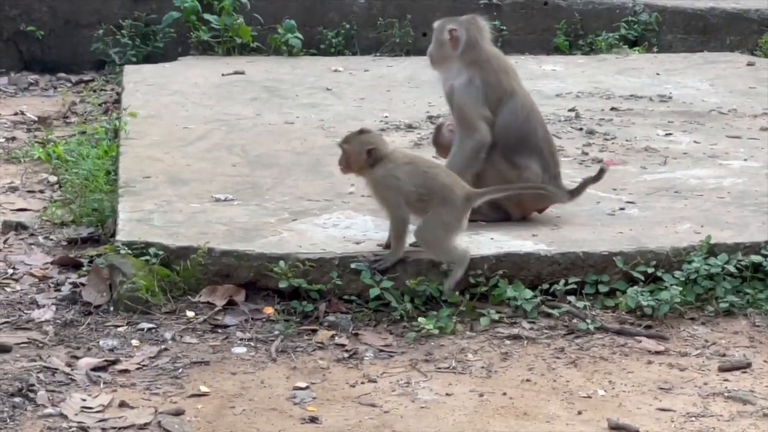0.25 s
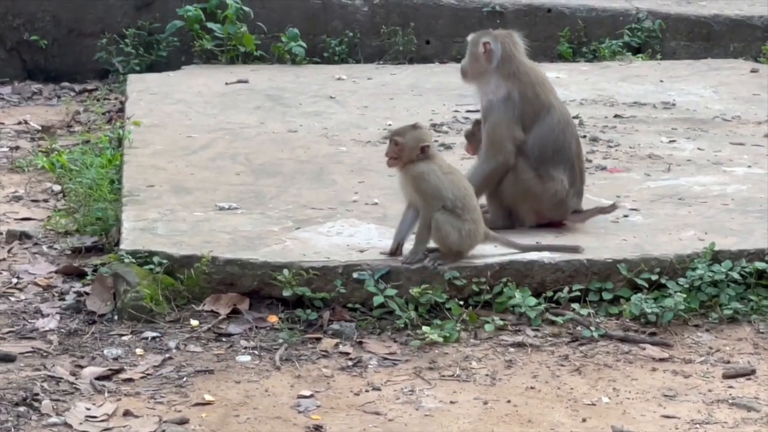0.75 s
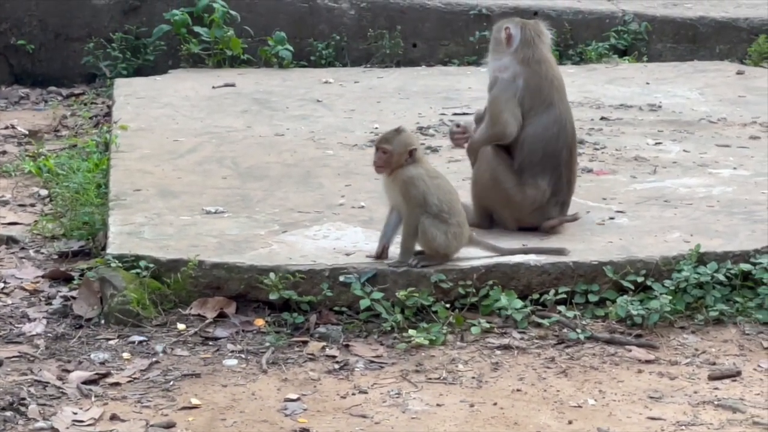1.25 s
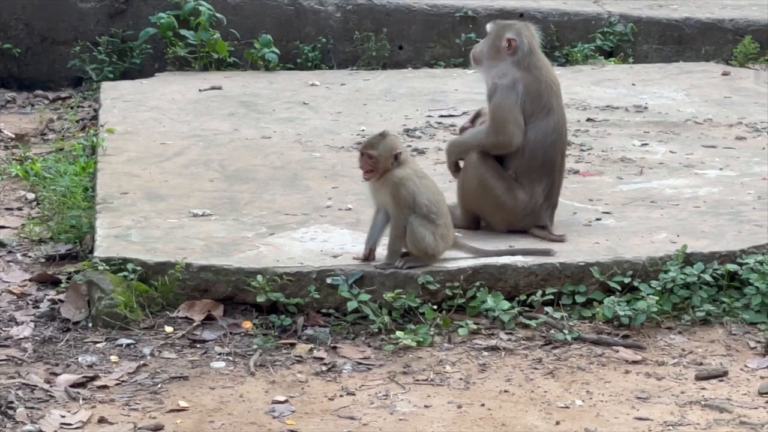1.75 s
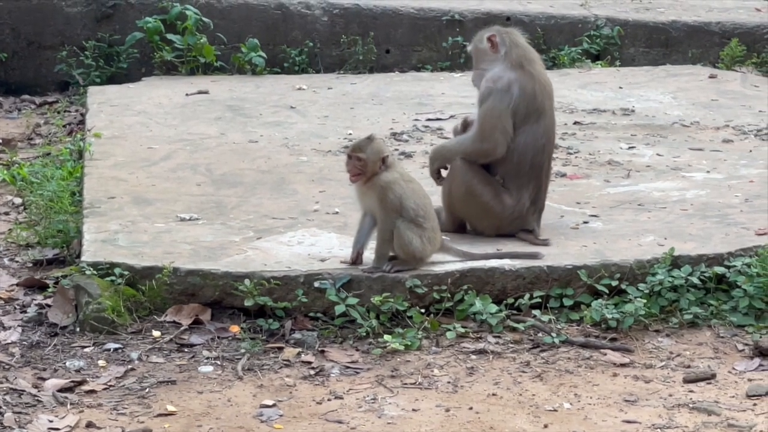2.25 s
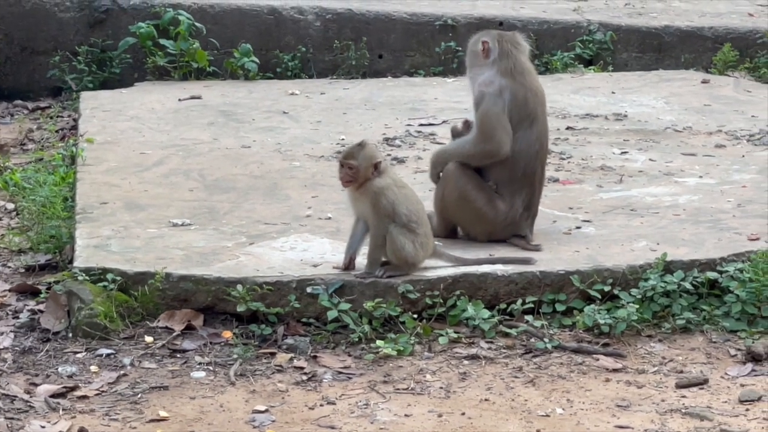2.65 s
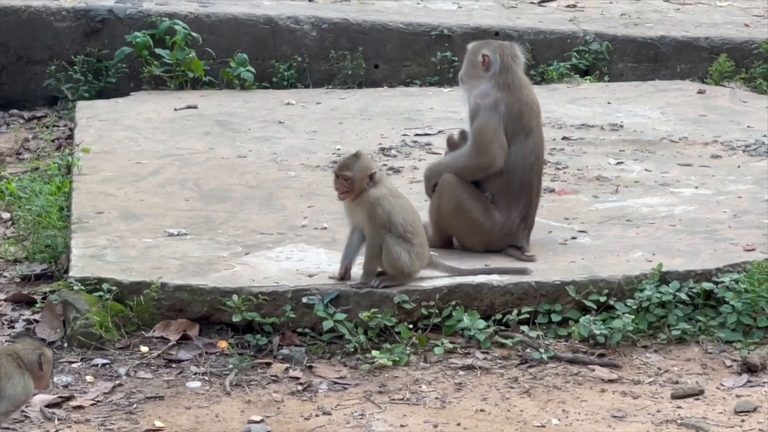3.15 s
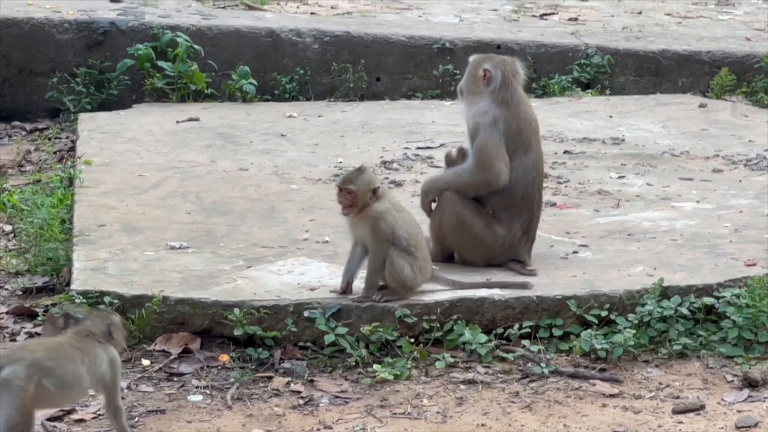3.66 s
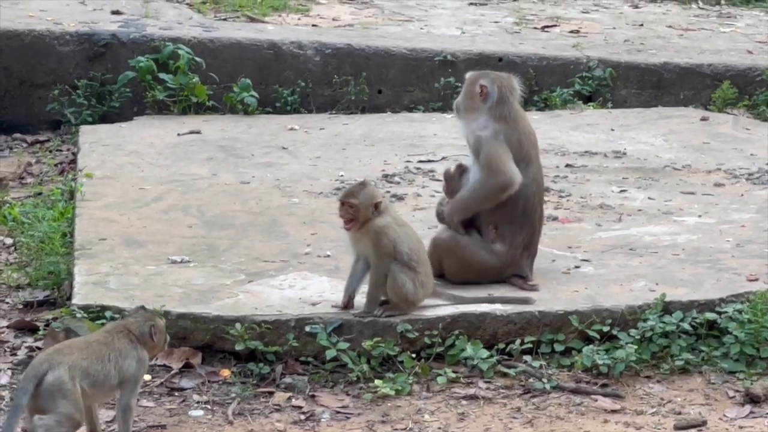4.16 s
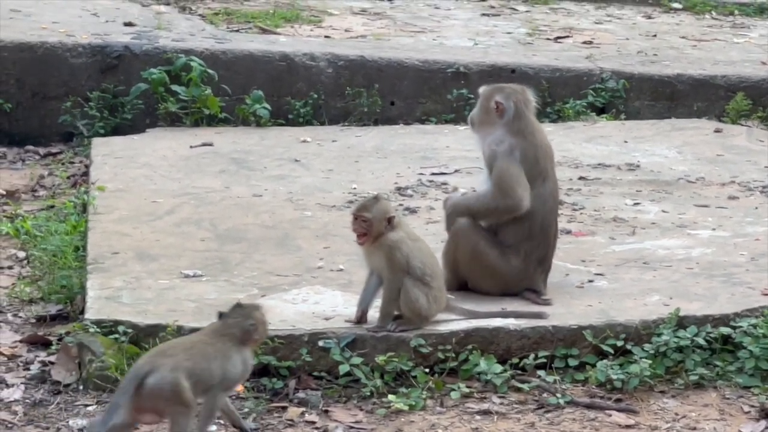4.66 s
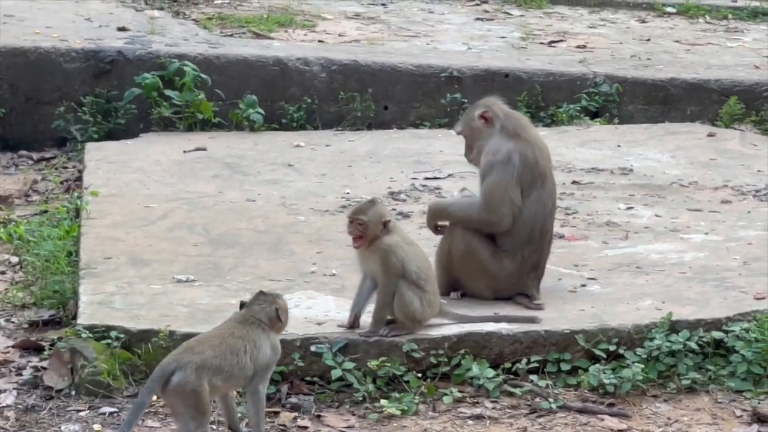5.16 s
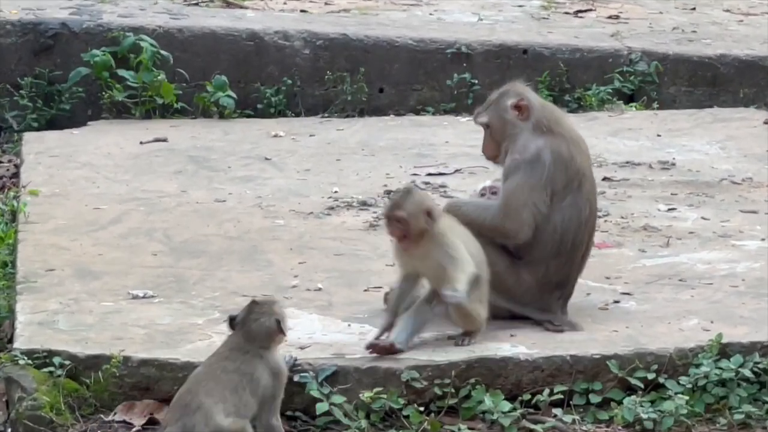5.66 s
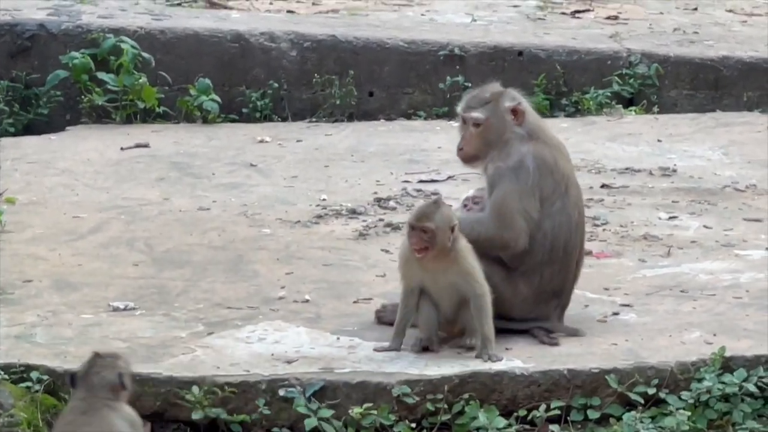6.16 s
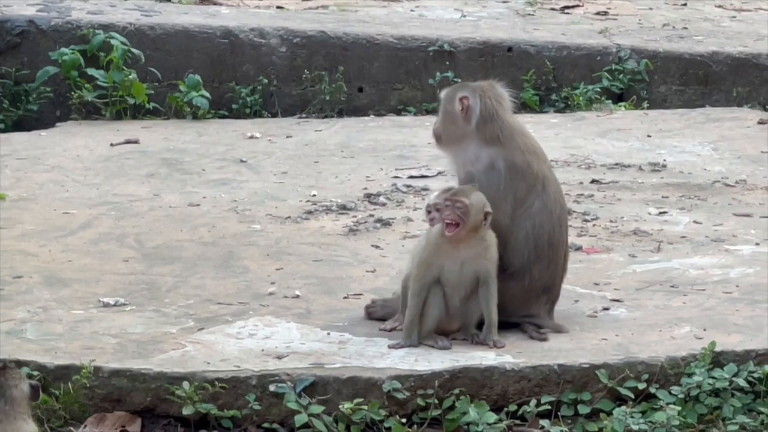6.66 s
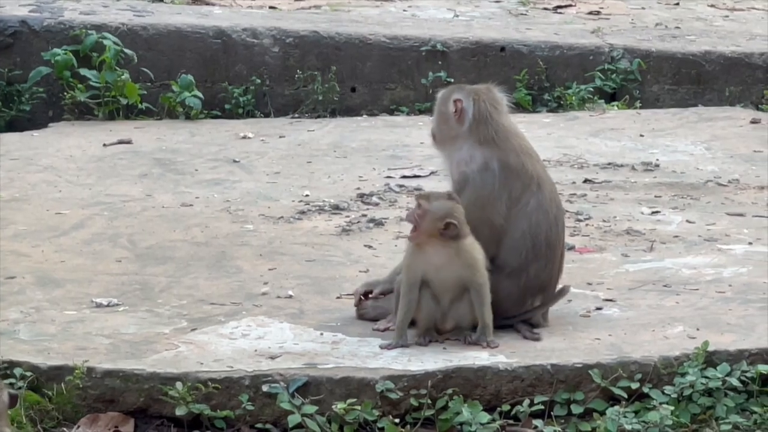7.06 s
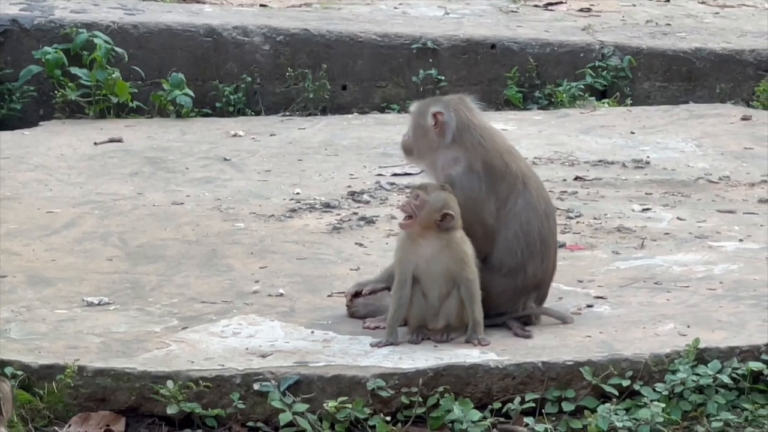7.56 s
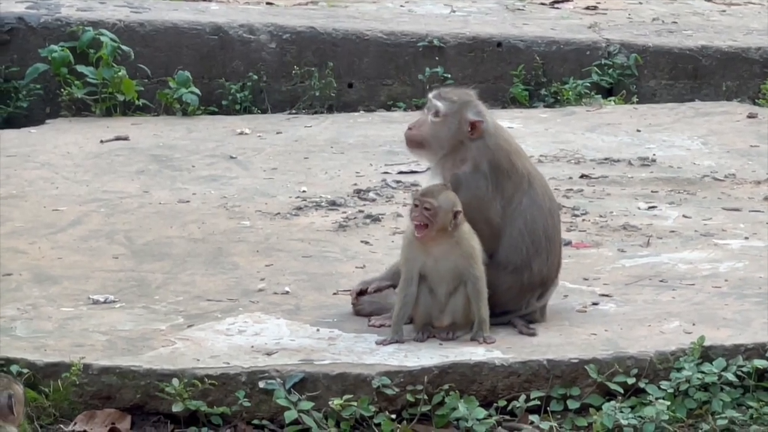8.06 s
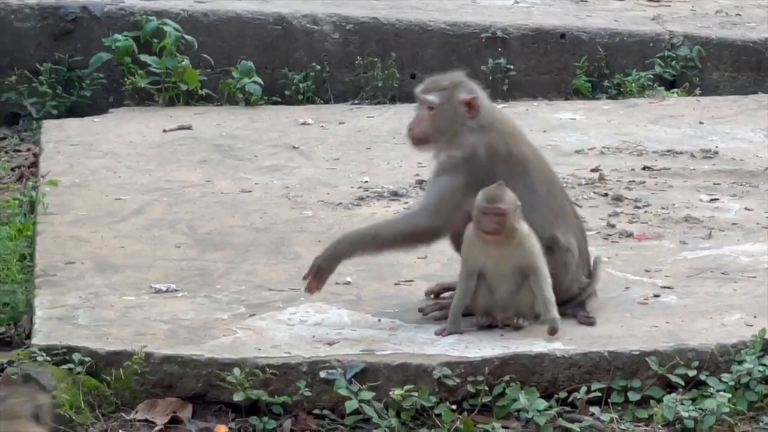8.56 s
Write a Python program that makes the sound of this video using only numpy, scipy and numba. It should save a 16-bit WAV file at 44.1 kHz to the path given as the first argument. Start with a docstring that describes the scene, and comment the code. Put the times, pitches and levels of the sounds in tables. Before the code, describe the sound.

Outdoor stereo scene, nearly nine seconds, young monkey at moderate distance. At 0 s a very high whistle dives into a hoarse bark. Yelps at 0.6, 1.3, 2.2, 2.8 and 3.4 s crack from a rough chest note up to a thin whistle; sharp barks fall near 0.8, 1.65 and 2.4 s. Faint far coos sound mostly before 3 s. From 3 s a nearby adult adds soft low grunts in trills of three to five pulses, continuing to 8.3 s. Wavering whistles swoop at 3.7-4.5 s. Shrill rasping screeches run 4.8-5.9 s, then a piercing, fluttering high scream 6.3-7.1 s, a bark, another whistle at 7.2 s, and harsh screeching 7.6-8.4 s that plunges in pitch. Two quick barks close at 8.7 s. Gusty low rumble, distant traffic and light hiss persist, with brief wall echo and diffuse tail.

```python
"""A young monkey on a stone slab opens with a diving whistle and a hoarse bark, then yelps that leap into whistles.
Far monkeys coo, mostly early on; from three seconds an adult nearby grunts in soft trills. Long shrill screeches
follow, then high whistles, hoarse screeches and two last barks. Voices are overtone stacks, rasp is fold slaps
ringing resonances, grunts are low throbs. Filtered noise makes the wind and distant traffic rumble and the
hiss throughout; an echo and a noise tail stand for trees and a wall."""
import sys
import numpy as np
from scipy import signal
from scipy.fft import rfft, irfft, next_fast_len
from scipy.io import wavfile
from scipy.ndimage import uniform_filter1d
from numba import njit

SR = 44100
rng = np.random.default_rng(int(sys.argv[2]) if len(sys.argv) > 2 else 0)


def inscribe(sig):
    """Save sig as 16-bit PCM at rate SR to the path in sys.argv[1].

    A 1-D sig is mono; a 2-D sig holds one channel per row.
    Samples are clipped to [-1, 1] before scaling.
    """
    pcm = np.round(np.clip(np.atleast_2d(sig).T, -1, 1) * 32767)
    wavfile.write(sys.argv[1], SR, pcm.astype(np.int16))


N = 388521

SPLIT_HZ = 6500  # overtones below and above this have separate levels
TOP_HZ = 15750  # upper limit of the whole scene


def undb(db):
    """Decibels to an amplitude factor."""
    return 10 ** (np.asarray(db) / 20)


def unit(x):
    """Scales x to an RMS of 1."""
    return x / np.sqrt(np.mean(x ** 2))


def read_spectrum(table, hz):
    """Reads a spectrum table on a log-frequency axis."""
    table_hz, values = np.transpose(table)
    return np.interp(np.log(np.maximum(hz, 1)), np.log(table_hz), values)


def shape_spectrum(x, gain):
    """Multiplies the spectrum of x by gain(Hz)."""
    size = next_fast_len(N + SR)
    bins_hz = np.arange(size // 2 + 1) * SR / size
    return irfft(rfft(x, size) * gain(bins_hz), size)[..., :N]


def hump(lo_hz, hi_hz, steep):
    """Gain curve that falls off below lo_hz and above hi_hz."""
    return lambda f: 1 / np.sqrt((1 + (lo_hz / (f + 1)) ** steep) * (1 + (f / hi_hz) ** steep))


def wander(rate):
    """Random levels held 1 / rate s and slewed twice; RMS 1."""
    hold = int(SR / rate)
    steps = np.repeat(rng.standard_normal(N // hold + 1), hold)
    return unit(uniform_filter1d(uniform_filter1d(steps, hold), hold)[:N])


def stretch(table, edge_s=.002):
    """Sample indices of a timed table, soft ends, and its columns interpolated there."""
    times_s, *columns = np.transpose(table)
    i = np.arange(int(times_s[0] * SR), min(int(times_s[-1] * SR), N))
    t = i / SR
    fade = np.clip(np.minimum(t - times_s[0], times_s[-1] - t) / edge_s, 0, 1)
    return i, fade, [np.interp(t, times_s, c) for c in columns]


@njit
def moving_bandpass(x, hz, width_hz):
    """State-variable band-pass with a moving centre and gain 1 at that centre."""
    y, band, low = np.empty(len(x)), 0., 0.
    for i in range(len(x)):
        g, damping = np.tan(np.pi * hz[i] / SR), width_hz / hz[i]
        v = (band + g * (x[i] - low)) / (1 + g * (g + damping))
        band, low, y[i] = 2 * v - band, low + 2 * g * v, damping * v
    return y


def background():
    """Gusty rumble in three noise bands, and the hiss of leaves, insects and town as coloured noise."""
    # rumble levels before the gusts: start_s, deep_db, middle_db, upper_db
    rumble = [(0.0, -39, -38, -45.5), (0.14, -38, -43.5, -48), (0.83, -37, -37, -43.5),
              (1.42, -47, -49, -53.5), (1.99, -38, -38, -46.5), (2.3, -45, -40, -53.5),
              (2.45, -33, -39.5, -62), (2.58, -47, -43, -56), (3.58, -46.5, -44.5, -55.5),
              (4.61, -48.5, -46.5, -56.5), (6.09, -44, -48.5, -56.5), (6.5, -53.5, -46.5, -64),
              (7.21, -38.5, -55, -52), (7.36, -47.5, -49, -60), (8.79, -50.5, -48.5, -59),
              (8.81, -62, -49, -69)]
    # colour of the hiss: frequency_hz, relative level_db
    air_colour = [(400, -3), (600, -3), (800, -6), (1200, -7.5), (1800, -12.5), (2600, -6.5), (3300, -40),
                  (3900, -13), (4800, -5.5), (6000, -18.5), (7200, -10), (8300, -11), (10200, -6.5),
                  (11700, -13), (13000, -42)]
    air_db = -57
    times_s, *levels = np.transpose(rumble)
    deep_db, middle_db, upper_db = (np.interp(np.arange(N) / SR, times_s, c) for c in levels)

    def noise(gain):
        return unit(shape_spectrum(rng.standard_normal(N), gain))

    deep = noise(hump(53.7, 75, 7.53)) * undb(deep_db + 2.5 * wander(6))
    middle = noise(hump(54.5, 153.0, 7.34)) * undb(middle_db + 2.8 * wander(14))
    upper = noise(hump(125, 215, 6.76)) * undb(upper_db + 2.0 * wander(14))
    air = noise(lambda f: undb(read_spectrum(air_colour, f)) * hump(380, 12300, 14)(f))
    return deep + middle + upper + air * undb(air_db + 1.2 * wander(7.6))


def far_calls():
    """Thin coos from other monkeys: five harmonics of a wavering pitch, coloured by a fixed spectrum."""
    # pitch and level paths, one per call: time_s, fundamental_hz, level_db before the colour
    coos = [
        [(.68, 824, -54), (.78, 866, -66), (.93, 757, -62)],
        [(.99, 882, -62), (1.1, 861, -60), (1.19, 817, -63)],
        [(1.23, 3410, -56), (1.35, 3436, -60), (1.5, 3330, -70)],
        [(1.49, 1480, -37), (1.53, 1425, -53.5), (1.575, 1325, -56)],
        [(2.56, 3460, -60), (2.68, 3430, -65), (2.8, 3420, -65)],
        [(6.47, 2520, -56), (6.57, 2106, -54), (6.8, 2100, -69), (7.1, 2088, -71)],
    ]
    # colour over the harmonics: frequency_hz, gain_db
    coo_colour = [(700, -25), (1500, -4), (2200, 0), (2800, 0), (3500, -1), (4600, -25)]
    out, waver = np.zeros(N), 0.00746 * wander(30)
    for table in coos:
        i, fade, (hz, db) = stretch(table, edge_s=0.034)
        phase = 2 * np.pi * np.cumsum(hz * (1 + waver[i])) / SR
        harmonics = sum(undb(read_spectrum(coo_colour, k * hz)) * np.sin(k * phase) for k in range(1, 6))
        out[i] += fade * undb(db) * harmonics
    return out


def tail(x, t60_s):
    """Scattered returns from trees and wall: decaying noise, strongest in the middle of the range."""
    t = np.arange(SR) / SR
    response = rng.standard_normal(SR) * 1000. ** (-t / t60_s) * np.clip(t / 0.015, 0, 1)
    response = response / np.sqrt(np.sum(response ** 2))
    size = next_fast_len(N + SR)
    wet = irfft(rfft(x, size) * rfft(response, size), size)[:N]
    return shape_spectrum(wet, hump(2500, 2770, 5.8))


def throbs():
    """The adult's trills spelled out as (s, level dB, pitch Hz, overtones dB), a little uneven."""
    # trills before swell, arch and chance: first_throb_s, last_throb_s, throbs (count),
    # first_level_db, last_level_db, first_pitch_hz, last_pitch_hz, overtones_db
    trills = [(3.011, 3.185, 4, -46.5, -44.5, 259.6, 237.2, -7),
              (3.621, 3.797, 4, -43.5, -48.5, 277.4, 230, -3.5),
              (4.326, 4.527, 4, -49, -49, 251.3, 233.4, -2.5), (4.616, 4.616, 1, -49, -53, 288, 286, -6),
              (4.955, 5.111, 4, -43, -52.5, 269.8, 242.4, -6),
              (5.363, 5.472, 3, -48, -46.5, 230.3, 258.7, -7.5),
              (5.698, 5.698, 1, -43, -42.5, 272.4, 274.6, -5), (6.095, 6.095, 1, -56.5, -55, 294.5, 300, 3),
              (6.729, 6.843, 2, -56.5, -52.5, 291.6, 296.7, 6.5),
              (7.034, 7.283, 5, -48, -50, 247, 245, -5.5), (7.612, 7.808, 4, -45, -43.5, 281.6, 274, -6),
              (8.098, 8.299, 4, -43, -41.5, 335.3, 288.8, -0.5)]
    swell_db, arch_ratio = 0.5, 0.031  # louder and higher in the middle
    out = []
    for first_s, last_s, count, db, last_db, hz, last_hz, over_db in trills:
        for a in np.linspace(0, 1, int(round(count))):
            arch, chance = np.sin(np.pi * a), rng.standard_normal(3)
            time_s = first_s + a * (last_s - first_s) + .004 * arch * chance[0]
            level_db = db + a * (last_db - db) + swell_db * arch + 0.6 * chance[1]
            pitch_hz = (hz + a * (last_hz - hz)) * (1 + arch_ratio * arch)
            out.append((time_s, level_db, pitch_hz, over_db + 2.8 * chance[2]))
    return out


def grunts(length_s=.065):
    """Each throb: a soft swell of a low voice that bends in pitch, with breathy overtones."""
    out, t = np.zeros(N), np.arange(int(length_s * SR)) / SR
    breath = unit(shape_spectrum(rng.standard_normal(N), hump(280, 1000, 2.6)))
    hoarse = wander(120)
    for s, db, hz, over_db in throbs():
        i = int((s - length_s / 2) * SR) + np.arange(len(t))
        bent_t = t - .04 * (t - length_s / 2) ** 2 / length_s  # pitch sags through the throb
        phase = 2 * np.pi * hz * bent_t + .22 * hoarse[i]
        over = sum(k ** -1.2 * np.sin(k * phase) for k in range(2, 7))
        puffs = breath[i] * (1 + np.cos(phase))  # breath pulses with each cycle
        sound = 1.4 * np.sin(phase) + undb(over_db) * (1.5 * over + .5 * puffs)
        out[i] += undb(db) * np.hanning(len(t)) * sound
    return out


def voiced():
    """Every voiced stretch of the young monkey as rows (s, pitch Hz, dB below the split, dB above it)."""
    # long screeches: time_s, pitch_hz, low_overtones_db, high_overtones_db (about the split)
    screeches = [
        [(4.863, 1925, -53, -40), (4.885, 1690, -60, -58), (4.955, 1723, -70, -46), (5.0, 2000, -60, -47),
         (5.055, 2062, -53, -58), (5.086, 1890, -57, -58), (5.13, 1990, -51.5, -51), (5.214, 1853, -55, -54),
         (5.27, 1862, -54, -60), (5.33, 1600, -56, -25)],
        [(5.561, 2220, -68, -51), (5.607, 1936, -54.5, -58), (5.673, 2216, -56, -55), (5.7, 2037, -59, -54),
         (5.819, 2045, -53, -55), (5.853, 1804, -50.5, -45), (5.889, 1400, -60, -34)],
        [(6.334, 2047, -54, -47), (6.364, 1847, -53, -43), (6.389, 1868, -52, -58), (6.427, 2220, -64, -61),
         (6.467, 2210, -65, -58)],
        [(7.72, 1898, -42, -43), (7.744, 1973, -53, -54), (7.8, 1940, -45, -31), (7.836, 1988, -44, -27),
         (7.856, 1910, -48.5, -36.5), (7.882, 1994, -44.5, -30), (7.958, 1778, -47.5, -37),
         (8.0, 1680, -56, -34), (8.034, 1738, -60, -38), (8.078, 2260, -50, -49), (8.106, 2052, -50.5, -34),
         (8.171, 1953, -49, -31), (8.207, 2118, -53, -59)],
        [(8.241, 1792, -69, -51), (8.267, 2010, -43, -48), (8.28, 1950, -70.5, -50), (8.293, 1910, -48, -29),
         (8.313, 1917, -49, -60), (8.345, 1663, -47, -45), (8.367, 1600, -63, -47), (8.381, 1396, -68, -22),
         (8.411, 1137, -49.5, -24), (8.429, 1081, -38, -47)],
    ]
    # yelps, a chest note that breaks and leaps to a whistle: start_s, break_s, top_s, end_s,
    # first_hz, top_hz, last_hz, chest_db, chest_treble_db, leap_db, whistle_db
    yelps = [(.568, .592, .637, .7, 1030, 7950, 8320, -40, -37, -34, -32),
             (1.311, 1.366, 1.436, 1.519, 900, 7900, 8500, -46, -46, -52, -43),
             (2.151, 2.181, 2.231, 2.3, 926, 7380, 7330, -39, -55, -41, -42),
             (2.802, 2.852, 2.925, 2.98, 900, 7600, 7600, -44, -52, -38, -40),
             (3.436, 3.464, 3.503, 3.54, 1000, 7630, 7800, -39, -42, -49, -35),
             (4.795, 4.81, 4.85, 4.882, 1080, 8700, 8660, -37, -52, -40, -37),
             (6.264, 6.272, 6.318, 6.344, 1250, 8800, 8700, -33, -47, -38, -31)]
    # path of the leap: share of its time (ratio), share of the top pitch (ratio), relative level_db
    leap_path = [(.2, 0.327, -20.5), (0.404, 0.707, 2), (0.724, .88, -6.5)]
    # free whistles, dives and swoops: time_s, pitch_hz, level_db
    whistles = [
        [(0.0, 9040, -40), (.03, 8900, -45), (.07, 8620, -33.5), (.094, 7120, -45), (.114, 4040, -55)],
        [(.75, 8010, -41), (.766, 7500, -35.5), (.782, 5950, -31), (.792, 5100, -40)],
        [(1.58, 8650, -58), (1.604, 7800, -38), (1.616, 7600, -41)],
        [(2.3, 7430, -73), (2.325, 7700, -46), (2.349, 7600, -61)],
        [(2.98, 7470, -47), (3.027, 7330, -41), (3.043, 6700, -35), (3.069, 5760, -28), (3.085, 4550, -65)],
        [(3.724, 8460, -40), (3.749, 8270, -46), (3.775, 8780, -35.5), (3.841, 9460, -38.5), (3.877, 9170, -36),
         (3.949, 7630, -29.5), (4.039, 7700, -32), (4.066, 6850, -39), (4.105, 5450, -31.5)],
        [(4.234, 8340, -33), (4.252, 8300, -50), (4.29, 8690, -35), (4.358, 8700, -57), (4.37, 8960, -35.5),
         (4.402, 8800, -49), (4.412, 8300, -33.5), (4.458, 7460, -34), (4.474, 7550, -54)],
        [(5.456, 7900, -22.5), (5.466, 8410, -27.5), (5.482, 9570, -23), (5.505, 9700, -33), (5.537, 9690, -29)],
        [(6.481, 9670, -25), (6.529, 9350, -34), (6.555, 9470, -18), (6.581, 9690, -23), (6.631, 10820, -28),
         (6.691, 10010, -15.5), (6.757, 9430, -24.5), (6.801, 9620, -27), (6.835, 10240, -17),
         (6.89, 10600, -22.5), (6.96, 10600, -35), (6.982, 11080, -26), (7.04, 11320, -30.5),
         (7.07, 10710, -26)],
        [(7.208, 8660, -31.5), (7.224, 9390, -22), (7.272, 10740, -28), (7.285, 10800, -22),
         (7.303, 10820, -24.5), (7.347, 10750, -27)],
    ]
    # barks: start_s, peak_s, end_s, first_hz, peak_hz, last_hz, peak_db, treble_db against the peak
    barks = [(.114, .155, 0.22, 1550, 1330, 1171, -37.5, -20),
             (.796, 0.806, 0.82, 1397, 1228, 1048, -34, -10),
             (1.633, 1.654, 1.674, 1618, 1376, 1314, -28, -18),
             (1.679, 1.684, 1.716, 1372, 1418, 1489, -26.5, -7),
             (1.828, 1.832, 1.85, 1210, 1160, 920, -43, -24),
             (2.401, 2.429, 2.424, 1397, 1250, 1062, -33, -10),
             (3.109, 3.135, 3.149, 1298, 1123, 1017, -42, -7),
             (4.131, 4.165, 4.19, 1540, 1320, 1390, -29, -18),
             (4.522, 4.531, 4.568, 1388, 1260, 1049, -37, -22),
             (7.125, 7.155, 7.21, 1622, 1462, 1433, -29, -21),
             (8.71, 8.725, 8.733, 1003, 1220, 1300, -47, 17.5),
             (8.73, 8.736, 8.73, 988, 1119, 1536, -32.5, -17)]
    chest_rise = 1.45  # pitch ratio over the chest note
    whistle_fade_db, octave_db, off_db = -18, -12.5, -68
    bark_start_db, bark_end_db = -8, -10.5  # against the peak
    out = list(screeches)
    for start_s, break_s, top_s, end_s, hz, top_hz, last_hz, chest_db, treble_db, leap_db, db in yelps:
        leap = []
        for time_share, pitch_share, step_db in leap_path:
            high_db = db + octave_db + step_db * (time_share < .5)
            leap.append((break_s + time_share * (top_s - break_s), pitch_share * top_hz,
                         leap_db + step_db, high_db))
        out.append([(start_s, hz, chest_db, treble_db), (break_s, chest_rise * hz, chest_db, treble_db), *leap,
                    (top_s, top_hz, off_db, db), (end_s, last_hz, off_db, db + whistle_fade_db)])
    for table in whistles:
        out.append([(s, hz, off_db, db) if hz > SPLIT_HZ else (s, hz, db, db + octave_db)
                    for s, hz, db in table])
    for start_s, peak_s, end_s, hz, peak_hz, last_hz, db, treble_db in barks:
        rows = ((start_s, hz, bark_start_db), (peak_s, peak_hz, 0), (end_s, last_hz, bark_end_db))
        out.append([(t, f, db + d, db + d + treble_db) for t, f, d in rows])
    return out


def rasp_controls():
    """Throat, mouth and shrill levels (dB) and two resonances (Hz), each pulled to the loudest rasp."""
    # hoarse bursts that open and close the calls: peak_s, attack_s, hold_s, fall (dB/s),
    # throat_db, mouth_db, shrill_db, throat_hz, shrill_hz (resonances)
    bursts = [(0.115, 0.018, 0.078, 350, -42.5, -44, -43.5, 2950, 7640),
              (0.583, 0.02, 0.012, 550, -40, -41.5, -30.5, 2230, 10360),
              (0.794, .02, 0.017, 400, -39.5, -42.5, -53, 3460, 5800),
              (1.349, .05, 0.0044, 450, -40.5, -42, -44, 1970, 9350),
              (1.383, 0.028, 0.005, 270, -65, -48, -37, 3400, 10600),
              (1.558, .015, .03, 324, -59, -72, -38, 2495, 10200),
              (1.636, 0.0088, .006, 254, -30.5, -36, -30.5, 2963, 9600),
              (2.165, 0.015, 0.0067, 380, -41, -41.5, -37.5, 2150, 7800),
              (2.198, .02, 0.0092, 380, -60, -49, -36, 3000, 9200),
              (2.409, 0.0055, 0.023, 397, -36.5, -39, -44, 2400, 7710),
              (2.839, 0.046, 0.0021, 800, -42, -43, -41.5, 2223, 9350),
              (3.073, 0.038, 0.0042, 303, -54, -56, -43, 4550, 5970),
              (3.113, 0.028, 0.0038, 300, -44, -48, -51, 2970, 6320),
              (3.456, 0.024, 0.0048, 550, -35, -33.5, -30, 2290, 9800),
              (4.133, .007, 0.023, 270, -38, -41, -39.5, 2800, 8160),
              (4.52, 0.0077, 0.019, 497, -37, -43.5, -46, 2750, 7330),
              (4.801, 0.0048, 0.0033, 700, -35.5, -46, -39, 2560, 8430),
              (4.831, 0.027, 0.0024, 750, -58, -44, -38, 3440, 7080),
              (5.336, 0.016, 0.071, 600, -36, -34, -35.5, 3500, 7626),
              (5.881, 0.01, 0.0089, 500, -37.5, -34, -37, 3600, 7604),
              (6.264, 0.004, 0.0057, 900, -35, -38, -32, 2240, 8260),
              (7.129, 0.02, 0.033, 422, -32, -40, -34.5, 3055, 8310),
              (7.37, 0.024, 0.0068, 318, -45, -35.5, -27.5, 3597, 9700),
              (7.609, 0.019, 0.0084, 700, -53, -51, -49, 3200, 8400),
              (7.649, .004, 0.028, 402, -33, -37.5, -30, 2840, 8990),
              (8.402, 0.026, 0.0047, 288, -26, -29, -27, 3653, 9360),
              (8.722, .015, 0.023, 498, -42, -50, -33.5, 2403, 8300),
              (8.742, 0.016, 0.0028, 450, -36, -47, -45, 2404, 8780)]
    # rasp held through the long calls: time_s, throat_db, shrill_db
    held_rasp = [
        [(0.0, -57, -37.5), (.1, -75, -40.5)],
        [(3.56, -57.5, -51), (3.67, -55.5, -42), (3.83, -57, -40.5), (4.0, -81, -56)],
        [(4.23, -74, -54), (4.33, -57.5, -52), (4.5, -67, -62), (4.614, -57, -53), (4.76, -84, -79)],
        [(4.855, -55, -32), (4.92, -53.5, -44), (4.96, -51.5, -40.5), (5.276, -59.5, -33), (5.32, -52, -43)],
        [(5.46, -58, -59), (5.565, -58.5, -38.5), (5.83, -59, -45), (5.865, -49, -34)],
        [(6.3, -52, -32), (6.354, -56, -38.5), (6.462, -49.5, -30.5), (6.472, -48, -22.5), (6.56, -56, -34),
         (6.6, -56, -23.5), (6.693, -73, -31.5), (7.09, -61.5, -28.5), (7.115, -68, -25)],
        [(7.21, -68, -45.5), (7.244, -58, -39), (7.333, -66, -48), (7.357, -64, -17)],
        [(7.7, -56, -29), (7.764, -56, -30.5), (7.986, -55.5, -19.5), (8.062, -52, -26.5), (8.19, -52, -27),
         (8.225, -40.5, -28), (8.26, -53, -28.5), (8.341, -49, -27), (8.385, -47, -27)],
    ]
    held_mouth_db, held_throat_hz, held_shrill_hz = -4.5, 3715, 10220  # mouth against the throat
    rest_db, rest_throat_hz, rest_shrill_hz = -69, 3240, 8130  # faint rasp between calls
    burst_from_db = -30  # one attack time ahead of the peak, against the peak
    haze_db = -26  # breath around a whistle, against the whistle
    power = np.full((3, N), undb(2 * rest_db))
    pull = power[[0, 2]] * [[rest_throat_hz], [rest_shrill_hz]]  # resonances weighted by power

    def add(i, dbs, throat_hz, shrill_hz, fade):
        p = fade * undb(2 * np.array(dbs))
        power[:, i] += p
        pull[0, i] += p[0] * throat_hz
        pull[1, i] += p[2] * shrill_hz

    for peak_s, attack_s, hold_s, fall, *dbs, throat_hz, shrill_hz in bursts:
        i = np.arange(int((peak_s - .08) * SR), min(int((peak_s + .3) * SR), N))
        late_s = i / SR - peak_s
        loss_db = np.maximum(burst_from_db * late_s / attack_s, fall * np.maximum(late_s - hold_s, 0))
        add(i, np.array(dbs)[:, None] - loss_db, throat_hz, shrill_hz, 1)
    for table in held_rasp:
        i, fade, (throat_db, shrill_db) = stretch(table, edge_s=0.0041)
        fade = np.where(i < .01 * SR, 1, fade)  # the first rasp is already sounding at the start
        add(i, (throat_db, throat_db + held_mouth_db, shrill_db), held_throat_hz, held_shrill_hz, fade)
    for table in voiced():
        i, fade, (hz, _, db) = stretch(table)
        whistling = fade * (hz > SPLIT_HZ) * np.array([[0], [0], [1]])  # shrill row only
        add(i, (db, db, db + haze_db), 0, hz, whistling)
        pull[1, i] += whistling[2] * (hz * power[2, i] - pull[1, i])  # a whistle takes the resonance along
    return (*(10 * np.log10(power)), *uniform_filter1d(pull / power[[0, 2]], size=200))


def slaps():
    """Fold slaps in turbulence: in step with a low voice (every second cycle in a long scream), else chaotic."""
    hz, held = np.full(N, 1350.), np.zeros(N)
    for table in voiced():
        i, fade, (pitch_hz, _, _) = stretch(table)
        chest = pitch_hz < 2400
        every = 2 if chest.sum() > .12 * SR else 1
        hz[i[chest]], held[i[chest]] = pitch_hz[chest] / every, fade[chest]
    jitter = (.25 * (1 - held) + .011 * held) * np.clip(wander(900), -2, 2)
    hz *= 1 + .006 * wander(45) + jitter
    phase = 2 * np.pi * np.cumsum(hz) / SR
    pulses = np.diff(np.exp(150. * (np.cos(phase) - 1)), prepend=0)
    turbulence = (1.1 - 0.34 * held) * rng.standard_normal(N)
    return (unit(pulses) + turbulence) * undb(3.07 * wander(60))


def rasp():
    """The slaps ring throat, mouth and the shrill gap between the teeth."""
    # scream endings, where the mouth closes and its resonance plunges:
    # start_s, level_db before the swell, final_hz, plunge_s
    plunges = [(0.077, -44.5, 2550, 0.037), (5.323, -23, 3250, 0.021), (5.865, -39, 3350, 0.019),
               (7.085, -34.5, 2933, 0.031), (7.344, -29.5, 3300, 0.0205), (8.37, -26, 3092, 0.028)]
    source, everywhere = slaps(), np.arange(N)

    def ring(i, hz, width_hz):
        hz = hz + 0. * i  # a fixed resonance becomes a path
        sound = source[i]
        for _ in range(3):
            sound = moving_bandpass(sound, hz, width_hz)
        return unit(sound)

    throat_db, mouth_db, shrill_db, throat_hz, shrill_hz = rasp_controls()
    throat = ring(everywhere, throat_hz, 1220.0) + 0.41 * ring(everywhere, 1820.0, 1300.0)
    mouth = ring(everywhere, 6310.0, 4060.0)
    shrill = ring(everywhere, shrill_hz, 2730.0) + 0.68 * ring(everywhere, 10670.0, 2760.0)
    shrill = shrill + 0.25 * ring(everywhere, shrill_hz, 720.0)
    out = undb(throat_db) * unit(throat) + undb(mouth_db) * mouth + undb(shrill_db) * unit(shrill)
    for start_s, db, end_hz, plunge_s in plunges:
        t = np.arange(int(.1 * SR)) / SR
        i = int(start_s * SR) + np.arange(len(t))
        hz = end_hz + (9500 - end_hz) * np.exp(-(t / plunge_s) ** 1.63)
        out[i] += undb(db) * np.sin(np.pi * t / t[-1]) ** 2.55 * ring(i, hz, 590.0)
    return shape_spectrum(out, hump(1200, 12300, 20))


def voice():
    """Overtone stack of the folds, weighted by the vocal tract; pitch and strength tremble."""
    # vocal tract: frequency_hz, gain_db
    tract = [(900, 2), (1500, -12), (2000, 4.5), (2700, -7.5), (3900, -3.5), (4700, -5), (6000, -1),
             (7500, 0.5), (10000, 16), (12000, 2), (13200, -11), (15500, -15)]
    out, waver = np.zeros(N), 0.00501 * wander(40) + 0.00834 * wander(500)
    shimmer = undb(1.6 * wander(70))
    k = np.arange(1, 17)[:, None]  # overtone numbers
    throat_hz = rasp_controls()[3]
    for table in voiced():
        i, fade, (hz, low_db, high_db) = stretch(table)
        hz = hz * (1 + waver[i])
        limit_hz = np.where(k > 2, 13300, TOP_HZ)
        weight = undb(read_spectrum(tract, k * hz)) * k ** -.3 * (k * hz < limit_hz)
        # the throat resonance of the moment lifts the nearest overtone
        weight = weight * (1 + 18.6 / (1 + ((k * hz - throat_hz[i]) / 610.0) ** 2))
        high = 1 / (1 + (SPLIT_HZ / (k * hz)) ** 24)  # share above the split
        waves = np.sqrt(2) * np.sin(k * 2 * np.pi * np.cumsum(hz) / SR)
        for share, db in ((1 - high, low_db), (high, high_db)):
            part = weight * share
            strength = np.sqrt((part ** 2).sum(0) + 1e-9)
            out[i] += fade * undb(db) * (part * waves).sum(0) / strength
    return out * shimmer * (1 + .25 * wander(900))  # fast flutter thickens every line


def scene():
    """Near and far calls with wall echo and tail over the background, as left and right."""
    # sound unrelated between the two sides: frequency_hz, share (ratio)
    apart = [(60, 0.016), (200, 0.18), (600, 0.52), (1500, 0.49), (3000, 0.017), (6000, 0.012),
             (8500, 0.027), (9500, 0.11), (11500, 0.15), (12500, .1)]
    echo_s, echo_db = .021, -14  # first return from the wall
    near, far = voice() + rasp() + grunts(), far_calls()
    near = near + undb(echo_db) * np.roll(near, int(echo_s * SR))
    calls = near + undb(18) * far  # far calls feed the tail more strongly
    mid = near + far + undb(-12.5) * tail(calls, 1.27) + background()
    # diffuse sound differs between the sides
    diffuse = undb(-24) * tail(calls, .9) + background()
    side = shape_spectrum(diffuse, lambda f: np.clip(read_spectrum(apart, f), 0, 1))
    return np.array([mid + side, mid - side])


def record(dry):
    """Sound reaches two ports with a pitch-dependent lag, the bass leans left; the top is cut."""
    # lag between the ports: frequency_hz, phase by which right leads left (radians)
    ports = [(300, 0), (1500, -.3), (3100, -.7), (4500, -.5), (6900, -.05), (7800, -.4), (8600, .1),
             (9000, 1.3), (10300, 3.15), (11700, 5.8), (12300, 6.3), (13400, 9.3), (14100, 9.9),
             (15200, 12.4)]
    # balance: frequency_hz, left minus right level_db
    left_lean = [(60, .3), (150, 1.4), (600, 1.7), (1200, .2), (3000, -.1)]
    port_hz, lead = np.transpose(ports)
    sides = np.array([[-.5], [.5]])  # left, right

    def port_gain(f):
        lag = np.exp(1j * sides * np.interp(f, port_hz, lead))
        return lag * undb(-sides * read_spectrum(left_lean, f))

    wet = shape_spectrum(dry, port_gain)
    return signal.sosfilt(signal.ellip(10, .2, 80, TOP_HZ, fs=SR, output="sos"), wet)


dry = scene()
out = record(dry)
inscribe(out)
```